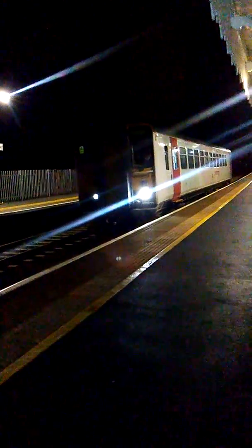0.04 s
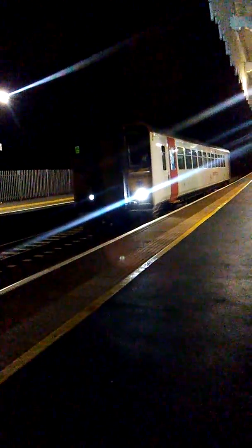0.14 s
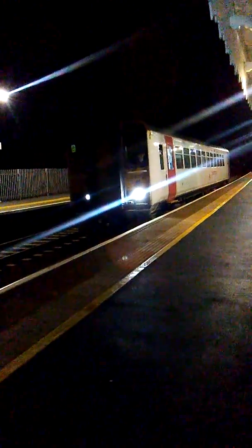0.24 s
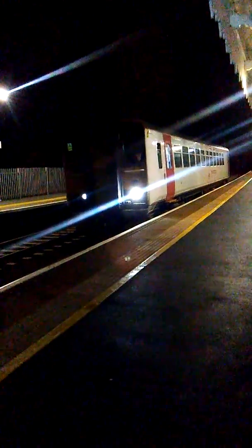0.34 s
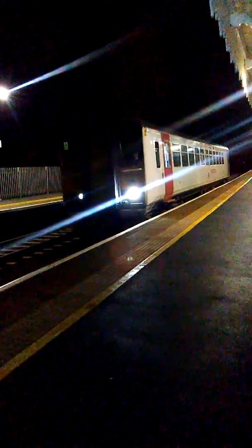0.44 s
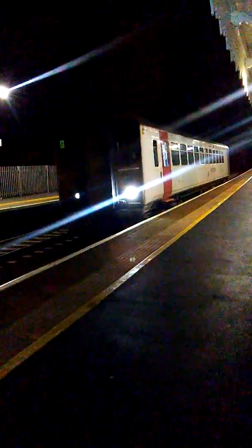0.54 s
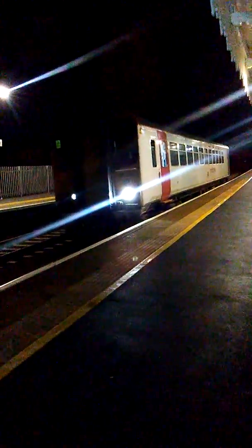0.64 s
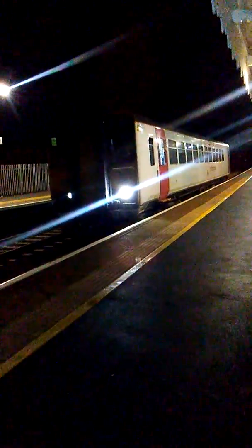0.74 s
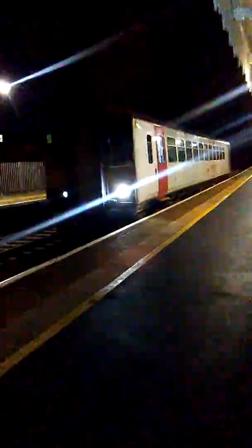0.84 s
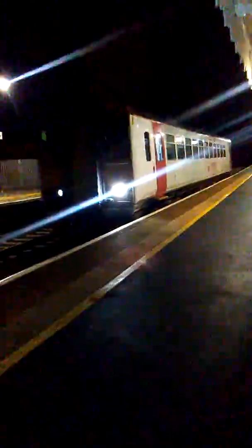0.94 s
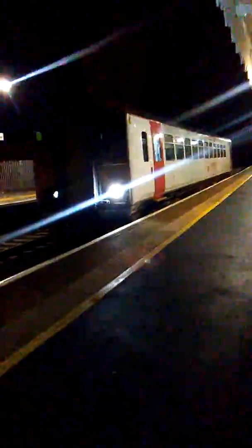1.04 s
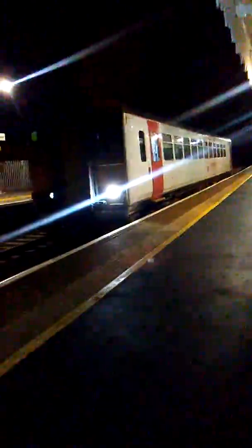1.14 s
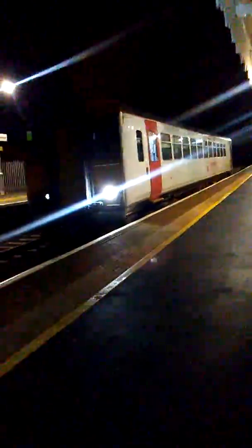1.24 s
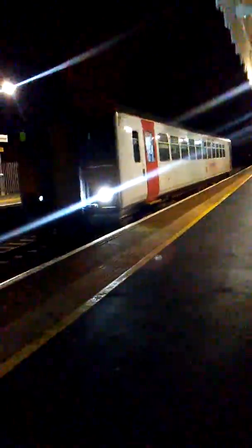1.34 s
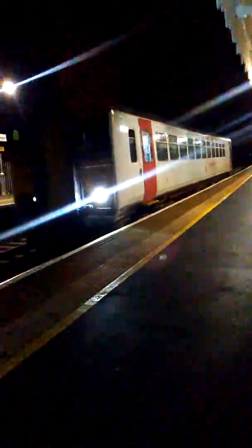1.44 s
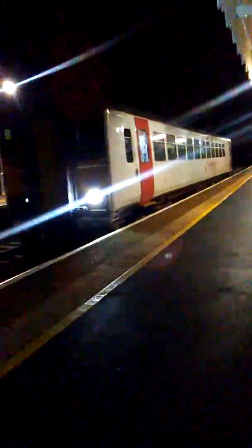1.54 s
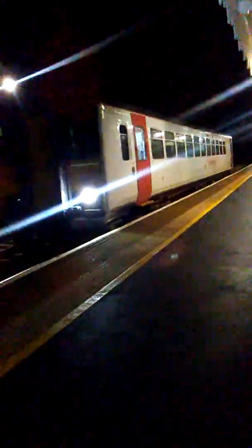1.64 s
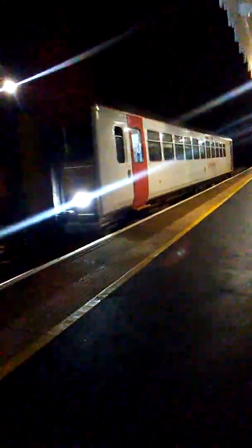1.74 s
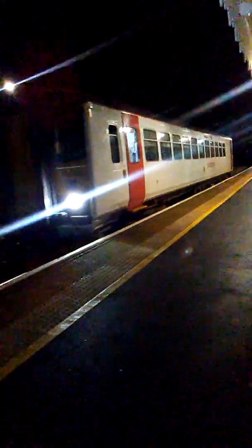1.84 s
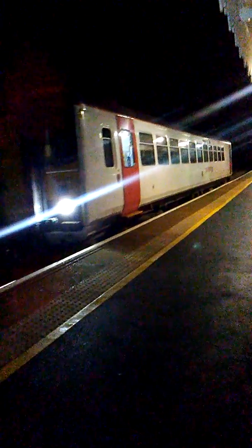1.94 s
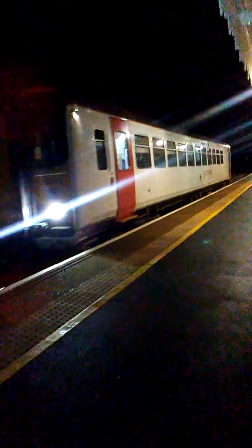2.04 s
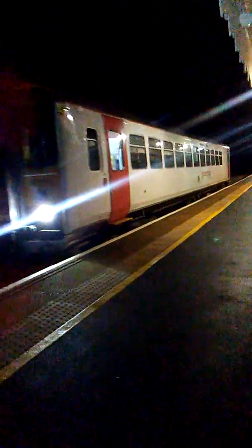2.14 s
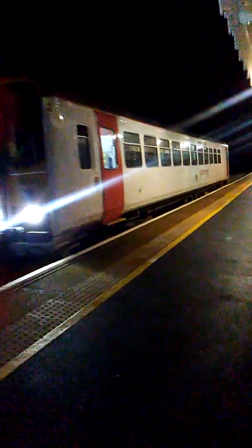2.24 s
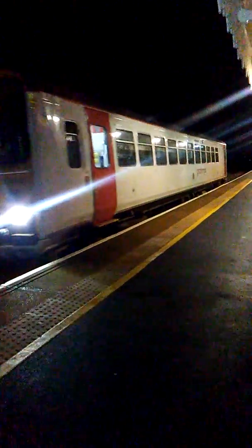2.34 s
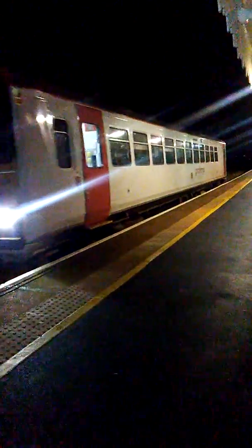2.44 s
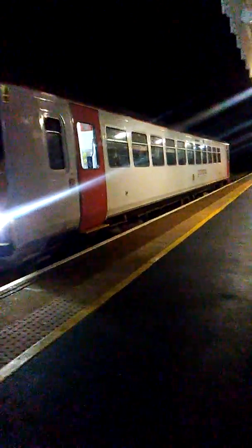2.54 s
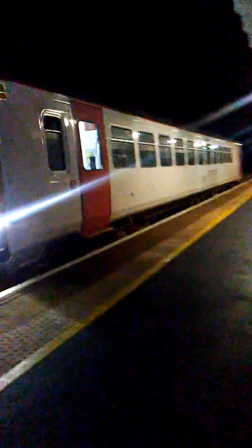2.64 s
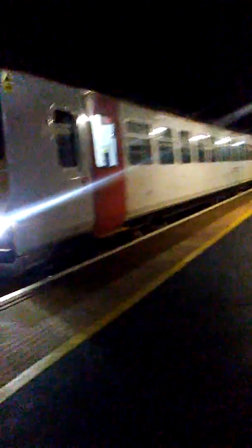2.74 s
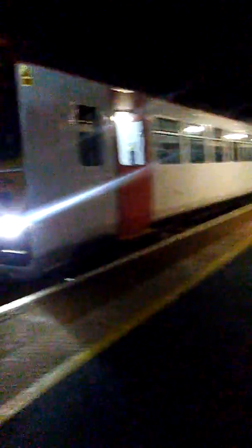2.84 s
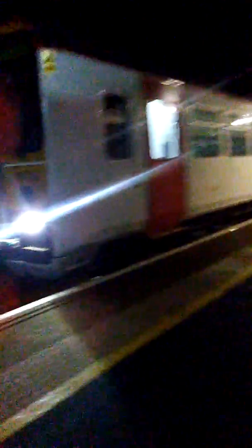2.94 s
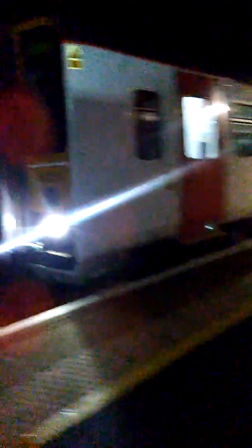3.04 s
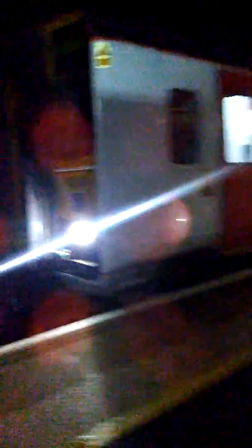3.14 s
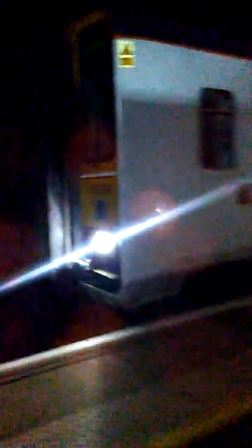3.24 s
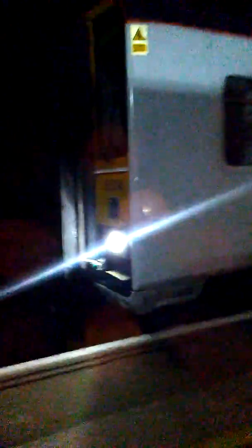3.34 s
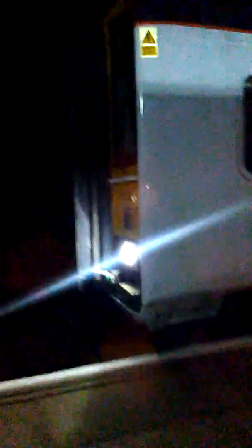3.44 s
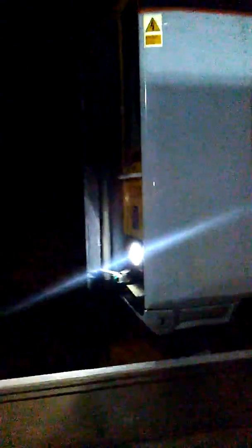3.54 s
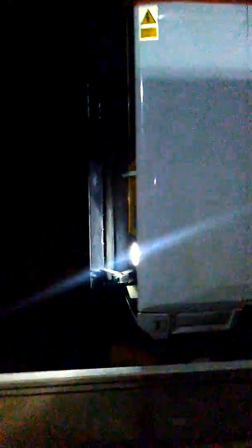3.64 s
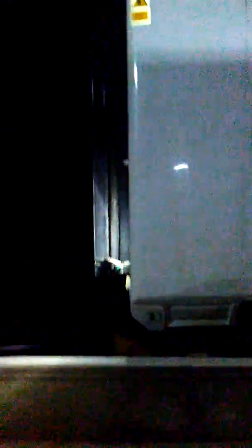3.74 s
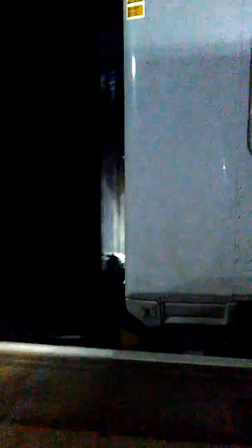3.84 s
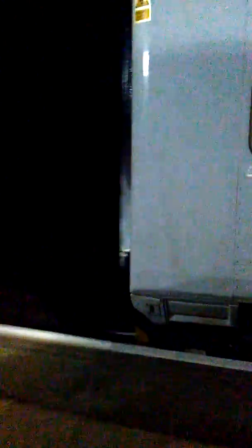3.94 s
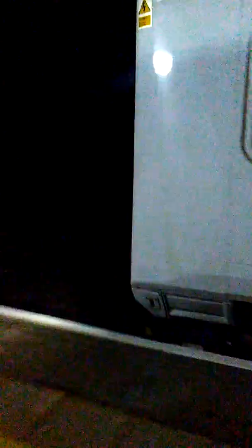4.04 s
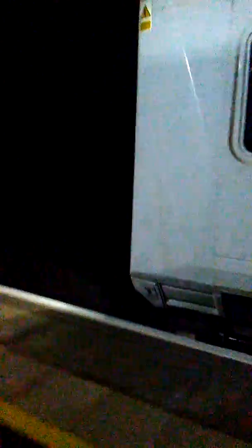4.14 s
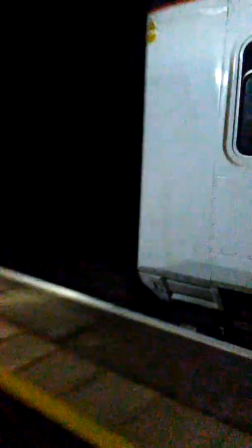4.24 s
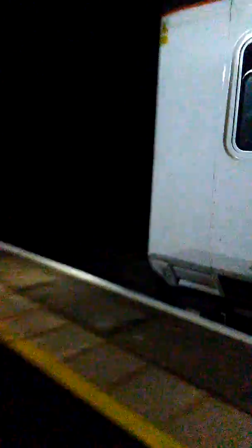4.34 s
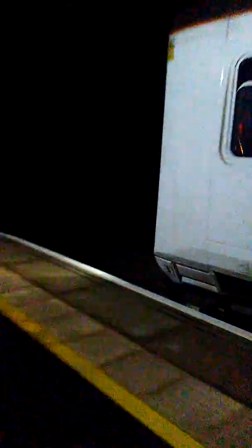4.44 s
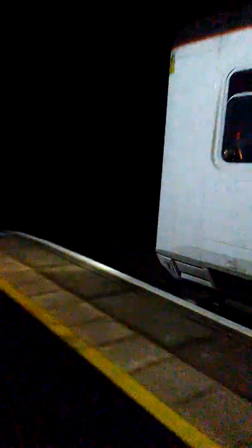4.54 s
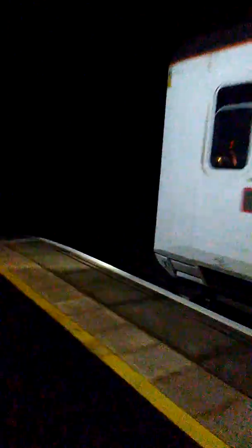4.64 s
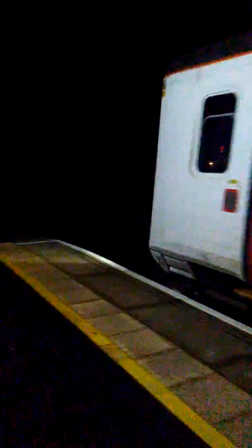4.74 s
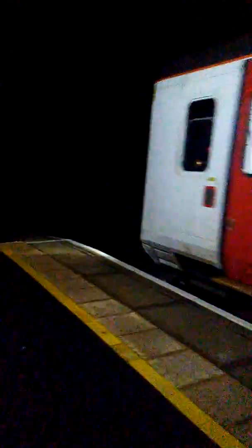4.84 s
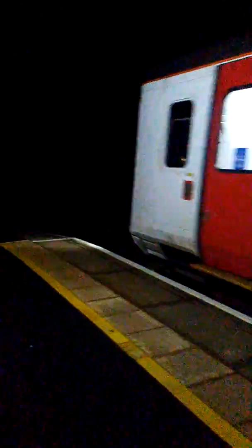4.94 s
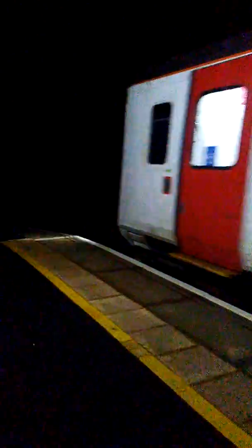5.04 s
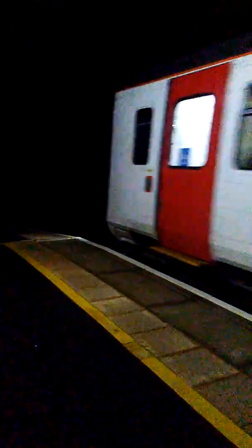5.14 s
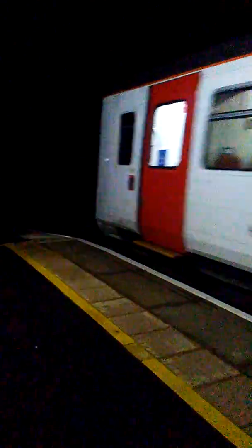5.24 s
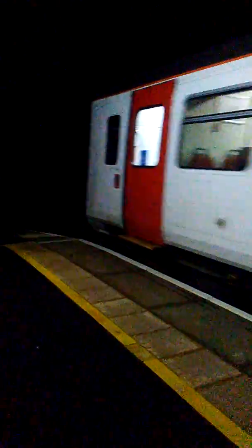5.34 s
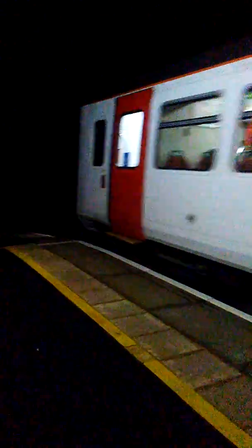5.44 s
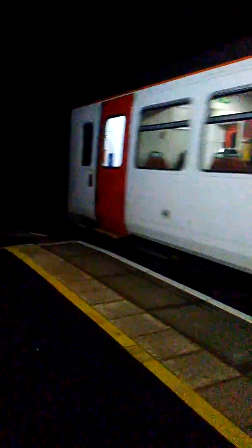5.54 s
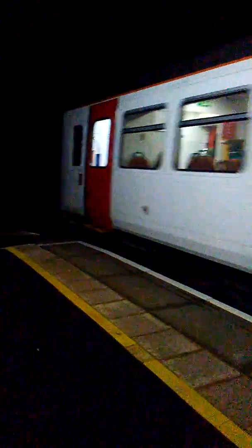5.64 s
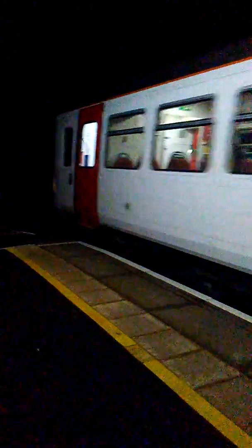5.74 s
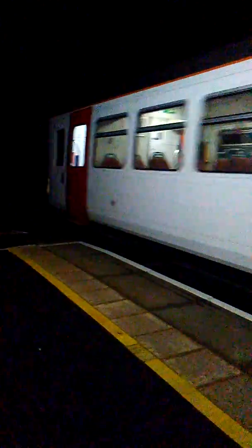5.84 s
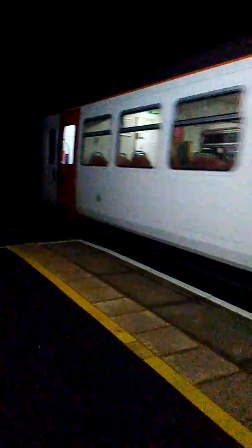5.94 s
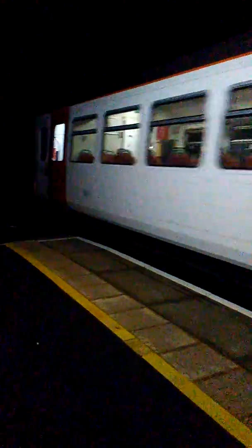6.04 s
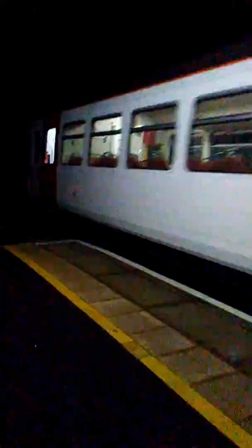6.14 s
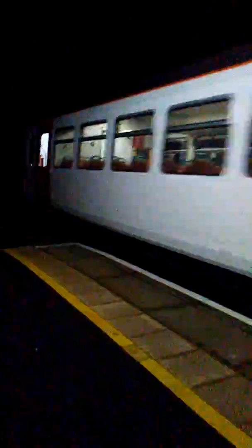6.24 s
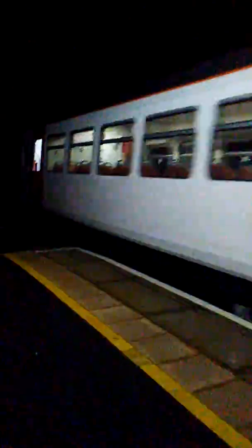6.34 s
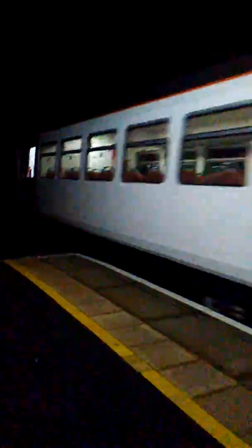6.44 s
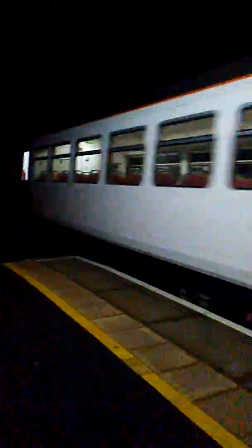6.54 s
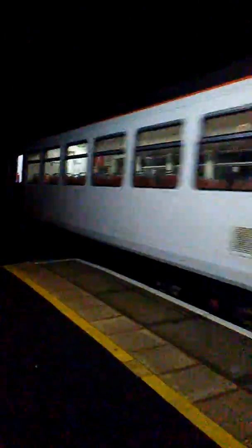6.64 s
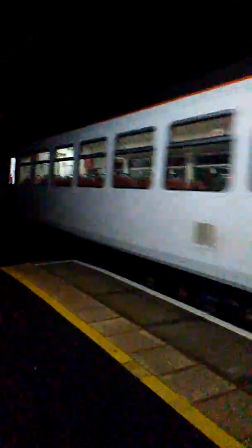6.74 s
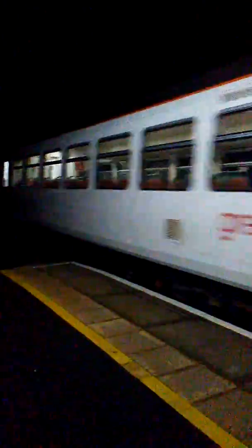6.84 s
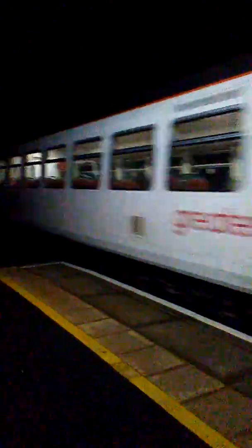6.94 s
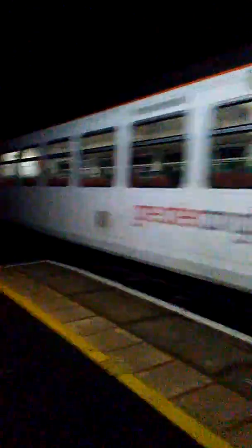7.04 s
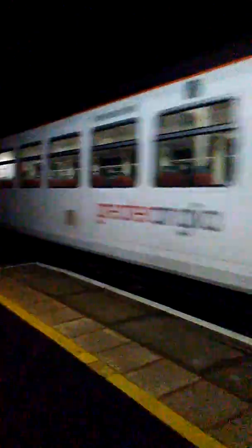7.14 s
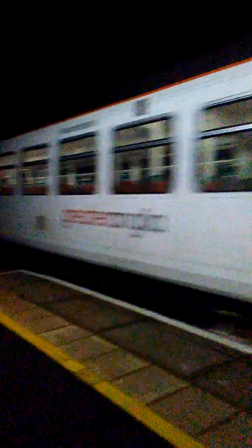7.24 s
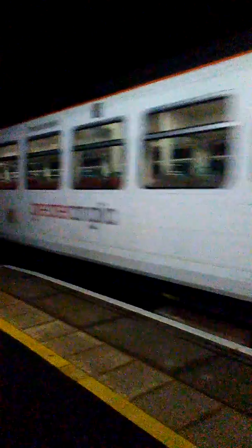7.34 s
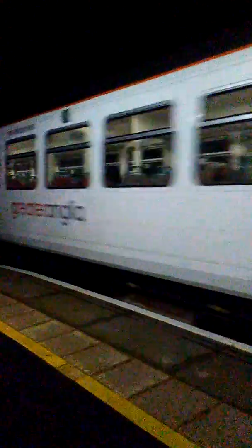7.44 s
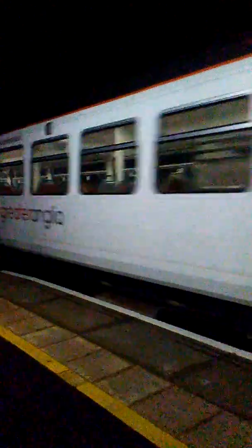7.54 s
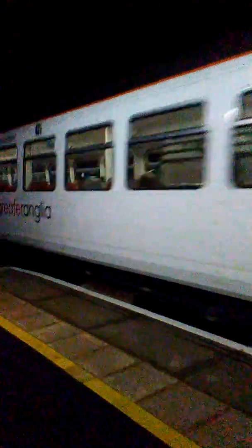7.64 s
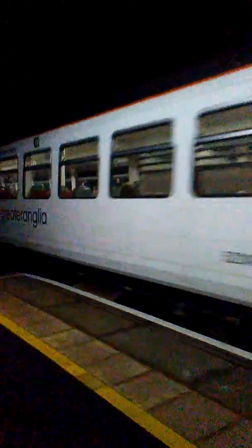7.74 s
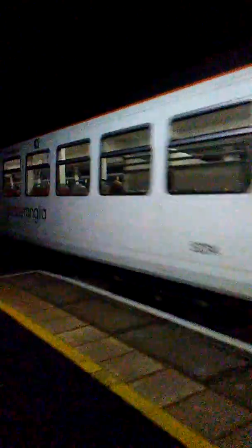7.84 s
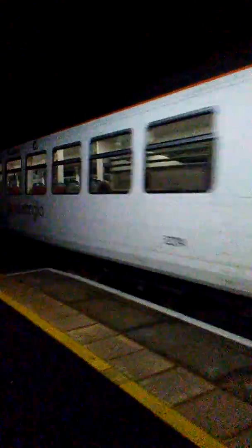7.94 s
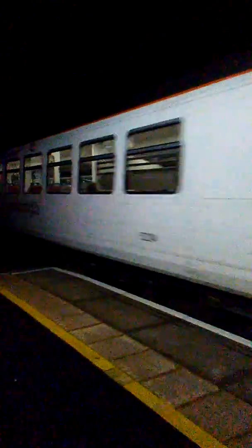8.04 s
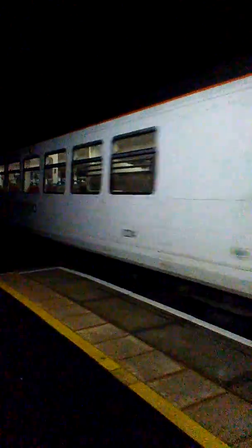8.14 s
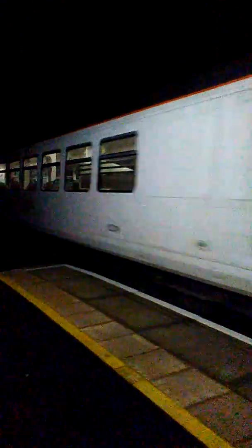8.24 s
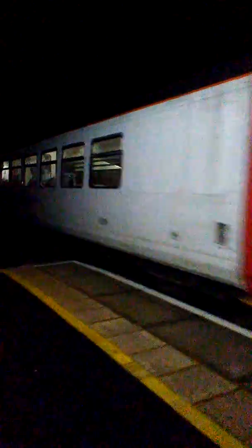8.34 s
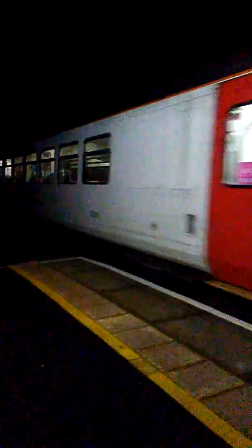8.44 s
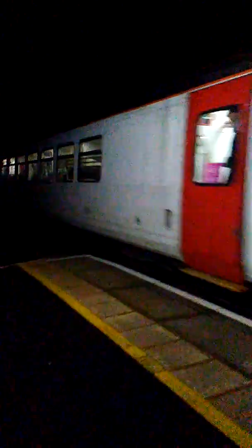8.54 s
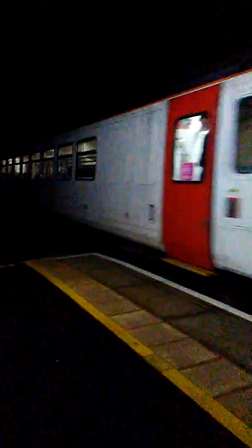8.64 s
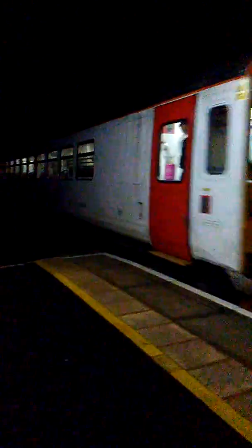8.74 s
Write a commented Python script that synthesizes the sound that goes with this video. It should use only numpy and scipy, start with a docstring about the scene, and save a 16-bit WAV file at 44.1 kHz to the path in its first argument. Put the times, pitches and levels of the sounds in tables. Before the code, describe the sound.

A single diesel railcar hums and clatters steadily past a night platform, swelling close with hissing air and spits, then easing away slightly lower.

```python
"""A six-cylinder diesel engine hums and clatters under the floor of a single-coach railcar passing a platform.
Its firing note, octave, boom and fan are tones locked to one falling firing rate; the block is a harmonic series.
Clatter, growl, hissing air and spits are shaped noise; thin whistles are blurred tones sinking with the engine.
Wheels, ground and underframe are coloured noise, the rails and the falling gear whine narrow bands of noise.
Each passing source has its own distance law; a notched microphone and a peak limiter follow."""
import sys
import numpy as np
from scipy import signal
from scipy.fft import rfft, irfft, next_fast_len
from scipy.io import wavfile
from scipy.ndimage import uniform_filter1d, minimum_filter1d, map_coordinates

SR = 44100
rng = np.random.default_rng(int(sys.argv[2]) if len(sys.argv) > 2 else 0)


def store_wav(level_fs):
    """Save 16-bit WAV to argv[1]."""
    pcm = np.round(np.clip(np.atleast_2d(level_fs), -1, 1) * 32767)
    wavfile.write(sys.argv[1], SR, pcm.T.astype(np.int16))


N = 387638
TIME = np.arange(N) / SR

# firing rate, Doppler shift included: time_s, firing_hz
FIRING_RATE = [(0, 98.3), (1, 97.7), (3, 97.5), (5.6, 97.4), (6.4, 96.7), (7.1, 95.5), (7.7, 94.8),
               (8.3, 93.9), (8.79, 93.4)]
# firing note, swelling and fading with the platform's reflections: time_s, level_db
FIRING_NOTE = [(0.0, -45), (0.27, -52.5), (0.66, -41), (1.22, -48), (2.67, -39.5), (2.84, -48.5),
               (3.23, -36.5), (4.68, -40), (5.24, -29.5), (5.7, -32.5), (6.22, -48), (6.36, -34),
               (7.37, -29.5), (7.76, -39.5), (7.83, -30.5), (8.17, -40.5), (8.74, -31.5), (8.79, -34)]
# its octave, which fades in other places: time_s, level_db
FIRING_OCTAVE = [(0.0, -40), (0.37, -32.5), (0.85, -43), (1.0, -28), (1.74, -27), (4.11, -36.5),
                 (4.28, -26), (4.48, -42), (4.55, -34), (4.7, -25), (6.19, -36.5), (6.51, -23), (7.1, -29),
                 (7.46, -18), (7.69, -23.5), (8.79, -25.5)]
# blade note of the cooling fan, swelling and fading with the platform's reflections: time_s, level_db
FAN_LEVEL = [(0, -33), (.55, -41), (.9, -29), (2.4, -34), (3.35, -26), (3.95, -44), (4.8, -24), (6.25, -30),
             (7.1, -21.5), (7.75, -32), (8.1, -22), (8.79, -26)]
# relative strength of the engine block's harmonics: frequency_hz, gain_db
BLOCK_SPECTRUM = [(30, -44), (48, -36), (64, -16), (82, -32), (125, -24), (160, -5), (210, 4), (255, 1),
                  (310, 1), (450, -0.5), (600, -13), (800, -6.5), (1100, -4.5), (2000, -31)]
# relative spectrum of the combustion noise: frequency_hz, density_db_per_hz
CLATTER_SPECTRUM = [(300, -28), (900, -10), (1500, 0.5), (1850, 1.5), (2350, 2), (2800, -3.5), (3300, -4.5),
                    (4000, -24), (5500, -23), (9000, -39.5)]
# relative spectrum of the injector rattle: frequency_hz, density_db_per_hz
RATTLE_SPECTRUM = [(2000, -28), (2900, -4), (3400, 7), (4000, -0.5), (4400, -0.5), (6000, -43)]
# reference level for the air hiss, spray and whistles: time_s, level_db
AIR_LEVEL = [(0.05, -48), (1.33, -46.5), (3.31, -38.5), (4.73, -38), (5.97, -29), (6.04, -26.5),
             (6.95, -26.5), (7.66, -32), (8.11, -38.5), (8.23, -48), (8.28, -42), (8.6, -54.5), (8.72, -54)]
# relative spectrum of the air hiss: frequency_hz, density_db_per_hz
HISS_SPECTRUM = [(2000, -38), (3800, -0.5), (6300, -3), (7500, 1.5), (8600, 7), (9300, 2.5), (9800, -6),
                 (11600, -15), (14200, -24), (15500, -37)]
# relative spectrum of the finest part of the hiss: frequency_hz, density_db_per_hz
SPRAY_SPECTRUM = [(7000, -32), (9800, -2), (11600, 2), (13000, -4.5), (14200, -7), (15500, -13)]
# relative spectrum of the wheel roar: frequency_hz, density_db_per_hz
ROLLING_SPECTRUM = [(20, -54), (55, -36), (125, -27), (175, -3.5), (240, -4.5), (450, -0.5), (620, -0.5),
                    (900, 0), (1150, -3.5), (1600, -4.5), (2400, -24.5), (4500, -59)]
# relative spectrum of the ground rumble: frequency_hz, density_db_per_hz
RUMBLE_SPECTRUM = [(15, -13), (40, -17), (60, 15), (90, 0), (160, -10), (300, -29)]
# relative resonances of the panels under the floor: centre_hz, width_hz, gain_db
PANELS = [(789, 81, 3.5), (1350, 114, 4.5), (1557, 200, 0.5), (2260, 160, -23), (3620, 480, -5.5)]
# tooth meshing in the final drive: time_s, mesh_hz
GEAR_MESH = [(0, 1725), (1, 1680), (2, 1635), (3, 1600), (4.4, 1550), (6.2, 1505), (6.9, 1470), (7.3, 1375),
             (7.7, 1345), (8.79, 1335)]
# brief singing of wheels and underframe: middle_s, length_s, pitch_hz, level_db
RESONANT_SONGS = [(.25, 1.2, 559, -33), (0.152, 0.38, 808, -30.5), (1.207, 0.78, 293, -30.5),
                  (1.68, .4, 323.7, -24), (2.6, 1.2, 870, -29.5), (2.3, 0.79, 1450, -30),
                  (3.8, 1.1, 829, -28), (5.15, .88, 1373, -27), (5.53, 0.18, 959, -23.5),
                  (6.196, 0.48, 1470, -21.5), (6.444, 0.64, 644, -22), (6.68, .25, 1013, -21.5),
                  (6.903, 0.9, 1557, -20.5), (7.153, 0.25, 261.6, -20), (8.1, 0.75, 995, -24.5)]
# sharp spits of hiss: start_s, level_db
SPIT_BURSTS = [(6.215, -16), (6.59, -14), (6.65, -17), (6.845, -20), (7.035, -13), (7.285, -23),
               (7.62, -24), (8.07, -29), (8.26, -31)]
# place of each source on the coach and how it carries: behind_cab_m, closest_m, level_alongside_db,
# coming_loss_db_per_doubling, going_loss_db_per_doubling
SOURCE_PLACES = { "rolling": (9, 6, -13, 5.5, 5), "ground": (10.5, 7.5, -39.5, 13, 23),
                 "rails": (5, 4, -27.5, 4.5, -0.5), "underframe": (16, 2, -16.5, 2.5, 2.3),
                 "gears": (15.5, 2, -20, 3.6, 4.5), "clatter": (12, 5, -13.6, 6, 10.5),
                 "injectors": (15.5, 0.98, -19.5, 3, 5.5), "block": (17.5, 3.5, -17.5, 3.1, 6.5),
                 "hollow": (18, 2.5, -20, 3, 10), "crankcase": (18, 1.5, -19, 6.5, 9),
                 "whistle": (14.5, 0.54, -29.5, 13, 8.5), }
# microphone response: frequency_hz, gain_db
MIC_RESPONSE = [(4000, 0.5), (4250, -11.5), (4450, -45), (5000, -37), (5400, -16), (6200, -2.5),
                (7000, 0.5)]

SPEED_M_PER_S, CAB_ALONGSIDE_S = 4.7, 4.0
FAN_RATIO = 3.655  # fan blades passing per firing
HISS_DB, SPRAY_DB, LOWER_DB, UPPER_DB = 5, -3, -1.5, -10.5  # relative to AIR_LEVEL
SPRAY_GROWS, WHISTLE_GROWS = 0.24, 0.2  # extra dB per dB of AIR_LEVEL: the highest sounds carry least far
LOWER_HZ, PARTNER_HZ, UPPER_HZ = 8950, 9250, 13870  # whistles while approaching
PUFF_COMING, PUFF_GOING, PUFF_CHANGE_S = 0.055, 0.14, (5.8, 6)  # puff depths, span of the change
RAIL_HZ, HOLLOW_HZ, HOLLOW_WIDTH_HZ = 795, 292, 50
SPIT_ATTACK_S, SPIT_T60_S = 0.0026, 0.098
TOP_HZ = 15750  # upper edge of the band


def amp(db):
    """A level in decibels is twenty times the logarithm of an amplitude ratio."""
    return 10 ** (np.asarray(db) / 20)


def unit(x):
    """Dividing by the root mean square gives unit rms."""
    return x / np.sqrt(np.mean(x ** 2) + 1e-20)


def gain(points, hz):
    """A spectrum in decibels is interpolated on a logarithmic frequency axis."""
    f, db = np.transpose(points)
    return amp(np.interp(np.log(hz + 1), np.log(f + 1), db))


def curve(rows):
    """A slowly varying quantity is linear between its (time, value) points."""
    s, values = np.transpose(rows)
    return np.interp(TIME, s, values)


def wobble(knots_per_s):
    """Random fluctuation: a spline through normally distributed knots."""
    coarse = np.append(TIME[::64], TIME[-1])
    knots = rng.standard_normal(int(TIME[-1] * knots_per_s) + 4)
    return np.interp(TIME, coarse, map_coordinates(knots, [coarse * knots_per_s]))


def filtered(x, response):
    """Linear filtering: the spectrum is multiplied by a frequency response."""
    m = next_fast_len(N + SR // 2)
    return irfft(rfft(x, m) * response(np.fft.rfftfreq(m, 1 / SR)), m)[:N]


def rush(response, patchy_db):
    """Coloured noise of unit rms, with gain that drifts in patches over time and frequency."""
    z = signal.stft(rng.standard_normal(N), nperseg=1024)[2]
    field = uniform_filter1d(rng.standard_normal(z.shape), size=5, axis=0)
    field = uniform_filter1d(field, size=16, axis=1)
    noise = signal.istft(z * amp(patchy_db * unit(field)), nperseg=1024)[1][:N]
    return unit(filtered(noise, response))


def turns(hz):
    """Phase in radians is the running integral of frequency."""
    return 2 * np.pi * np.cumsum(hz) / SR


def fuzzy(phase, knots_per_s):
    """Random quadrature modulation broadens a tone into a narrow band of noise."""
    return unit(wobble(knots_per_s) * np.cos(phase) + wobble(knots_per_s) * np.sin(phase))


def throb(phase, sharpness):
    """Periodic amplitude modulation: one swell per turn, with unit rms."""
    return unit(np.exp(sharpness * np.cos(phase)))


def passing(source):
    """Distance law: level falls with each doubling of distance, at separate rates coming and going."""
    behind_m, closest_m, db, coming_db, going_db = SOURCE_PLACES[source]
    past_m = SPEED_M_PER_S * (TIME - CAB_ALONGSIDE_S) - behind_m
    doublings = np.log2(np.hypot(past_m / closest_m, 1))
    return amp(db - doublings * np.where(past_m < 0, coming_db, going_db))


def exhaust(firing):
    """Periodic firing radiates a clean fundamental and its octave."""
    note = amp(curve(FIRING_NOTE)) * unit(np.sin(firing))
    octave = amp(curve(FIRING_OCTAVE)) * unit(np.sin(2 * firing + 0.13 * wobble(7)))
    return note + octave


def crankcase(firing):
    """A boom locked to 8/3 of the firing rate fluctuates in amplitude and phase."""
    boom = np.sin(firing * 8 / 3 + 0.36 * wobble(9.6))
    return passing("crankcase") * unit(amp(2.2 * wobble(9)) * boom)


def cooling_fan(firing):
    """Blade passing on a belt-driven fan makes a tone in fixed ratio to the firing rate."""
    return amp(curve(FAN_LEVEL)) * unit(np.sin(FAN_RATIO * firing + 0.2 * wobble(6.9)))


def block(cycle, odd_db, count=90):
    """Unequal cylinders excite engine-cycle harmonics, each fading as the echo paths change."""
    cycle_hz = np.mean(np.array(FIRING_RATE)[:, 1]) / 6
    hum = np.zeros(N)
    # leave out the orders of the firing note, octave and boom, and the one nearest the fan
    for k in np.setdiff1d(np.arange(count) + 1, [6, 12, 16, 22]):
        # short waves fade more deeply than long ones
        fading_db = min(k / 4, 4) * wobble(2.4)
        drift = rng.uniform(0, 2 * np.pi) + .5 * wobble(2.5)
        # odd k, the half orders of the crankshaft, are weaker
        level_db = odd_db * (k % 2) + fading_db
        hum += gain(BLOCK_SPECTRUM, k * cycle_hz) * amp(level_db) * np.sin(k * cycle + drift)
    return passing("block") * unit(hum)


def growl(cycle):
    """Cavity resonance under the floor: a band of noise modulated twice per engine cycle."""
    hollow = lambda hz: 1 / (1 + ((hz - HOLLOW_HZ) / HOLLOW_WIDTH_HZ) ** 4)
    return passing("hollow") * throb(2 * cycle, sharpness=0.26) * rush(hollow, patchy_db=1.0)


def clatter(cycle, firing):
    """Combustion and injector impacts: noise modulated by the firings and the engine cycle."""
    beat = throb(firing, sharpness=0.091) * throb(cycle, sharpness=0.02) * throb(2 * cycle, sharpness=0.044)
    knock = passing("clatter") * rush(lambda hz: gain(CLATTER_SPECTRUM, hz), patchy_db=0.3)
    rattle = passing("injectors") * rush(lambda hz: gain(RATTLE_SPECTRUM, hz), patchy_db=1.0)
    return beat * (knock + rattle)


def air(cycle, firing_hz):
    """Air from the engine yields noise and whistles, modulated by puffs that deepen near 6 s."""
    level_db = curve(AIR_LEVEL)
    near_db = level_db - level_db.max()
    # whistle pitches follow the firing rate, relative to its value while approaching
    doppler = turns(firing_hz / FIRING_RATE[2][1])
    depth = np.interp(TIME, PUFF_CHANGE_S, [PUFF_COMING, PUFF_GOING])
    unsteady = amp(.55 * wobble(25) + .6 * wobble(250))
    puffs = throb(cycle, depth) * throb(2 * cycle, depth / 2) * unsteady

    hiss = amp(HISS_DB) * rush(lambda hz: gain(HISS_SPECTRUM, hz), patchy_db=1.5)
    spray = rush(lambda hz: gain(SPRAY_SPECTRUM, hz), patchy_db=2.5)
    spray = amp(SPRAY_DB + SPRAY_GROWS * near_db) * spray

    flutter = amp(3 * wobble(16))
    lower = fuzzy(LOWER_HZ * doppler, knots_per_s=420) * flutter
    lower = lower + amp(-9) * fuzzy(PARTNER_HZ * doppler, knots_per_s=160)
    upper = fuzzy(UPPER_HZ * doppler, knots_per_s=570) * amp(1.5 * wobble(15))
    whistles = amp(WHISTLE_GROWS * near_db) * (amp(LOWER_DB) * lower + amp(UPPER_DB) * upper)
    # the upper whistle also beams straight out sideways
    return puffs * (amp(level_db) * (hiss + spray + whistles) + passing("whistle") * upper)


def wheels():
    """Rolling contact: steel wheels on uneven rails radiate broadband noise and shake the ground."""
    roar = rush(lambda hz: gain(ROLLING_SPECTRUM, hz), patchy_db=1.5)
    roar = passing("rolling") * amp(0.35 * wobble(14)) * roar
    rumble = passing("ground") * rush(lambda hz: gain(RUMBLE_SPECTRUM, hz), patchy_db=3)
    return roar + rumble


def panel_response(hz):
    """Modal superposition: damped resonances of alternating sign, with a high-frequency roll-off."""
    total = 0
    for k, (centre, width, db) in enumerate(PANELS):
        damping = 1j * hz * width
        total = total + (-1) ** k * amp(db) * damping / (centre * centre - hz * hz + damping)
    return total / (1 + (hz / 4800) ** 8)


def underframe():
    """Broadband noise rings the resonant panels under the floor."""
    return passing("underframe") * rush(panel_response, patchy_db=2)


def gears():
    """Tooth meshing in the final drive makes a blurred tone at the mesh frequency."""
    return passing("gears") * fuzzy(turns(curve(GEAR_MESH)), knots_per_s=30)


def rails():
    """The rail bends between its sleepers in one narrow resonance."""
    return passing("rails") * fuzzy(2 * np.pi * RAIL_HZ * TIME, knots_per_s=50)


def songs():
    """Narrow resonances of wheels and underframe swell and fade under half-cosine envelopes."""
    out = np.zeros(N)
    for middle_s, length_s, hz, db in RESONANT_SONGS:
        swell = np.cos(np.pi * np.clip((TIME - middle_s) / length_s, -.5, .5))
        tone = unit(np.sin(2 * np.pi * hz * TIME + 0.92 * wobble(45)))
        out += amp(db) * swell * tone
    return out


def spits():
    """Transient noise: bursts of hiss with a fast rise and an exponential decay."""
    bursts = np.zeros(N)
    for start_s, db in SPIT_BURSTS:
        age = np.maximum(TIME - start_s, 0)
        bursts += amp(db - 60 * age / SPIT_T60_S) * (1 - np.exp(-age / SPIT_ATTACK_S))
    return bursts * rush(lambda hz: gain(HISS_SPECTRUM, hz), patchy_db=1.5)


def scene():
    """Superposition of engine and running gear at the platform."""
    firing_hz = curve(FIRING_RATE)
    firing = turns(firing_hz)
    # six firings make one engine cycle
    cycle = firing / 6
    drone = exhaust(firing) + crankcase(firing) + cooling_fan(firing)
    drone = drone + block(cycle, odd_db=-3.5) + growl(cycle)
    engine = drone + clatter(cycle, firing) + air(cycle, firing_hz) + spits()
    running_gear = wheels() + underframe() + gears() + rails() + songs()
    return (engine + running_gear)[None]


def record(dry):
    """The microphone has a deep notch, a limiter holds the peaks down, and the band ends steeply."""
    heard = filtered(dry[0], lambda hz: gain(MIC_RESPONSE, hz))
    needed = np.minimum(1, .96 / (np.abs(heard) + 1e-9))
    # hold each gain minimum, then smooth it, so that the gain moves gradually around peaks
    held = minimum_filter1d(needed, size=161)
    smooth = uniform_filter1d(uniform_filter1d(held, size=81), size=81)
    return filtered(heard * smooth, lambda hz: hz < TOP_HZ)[None]


dry = scene()
out = record(dry)
store_wav(out)
```